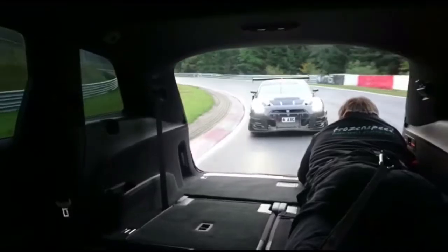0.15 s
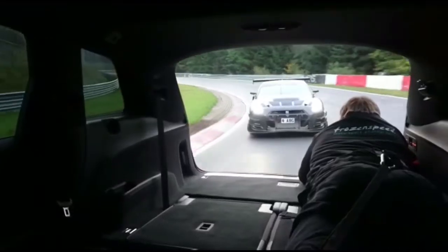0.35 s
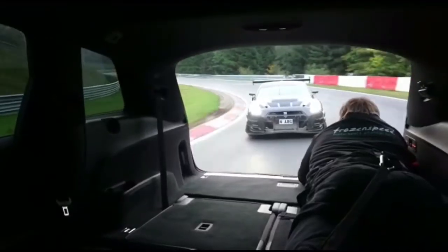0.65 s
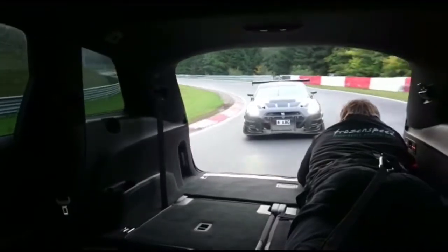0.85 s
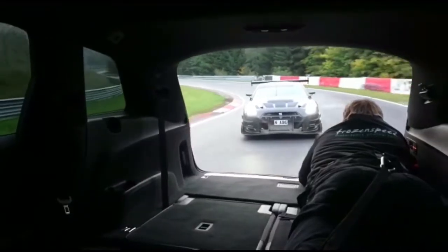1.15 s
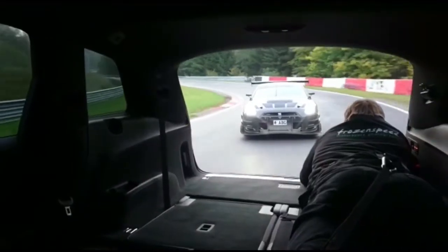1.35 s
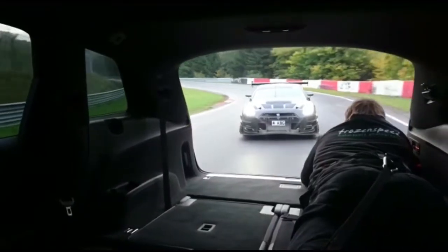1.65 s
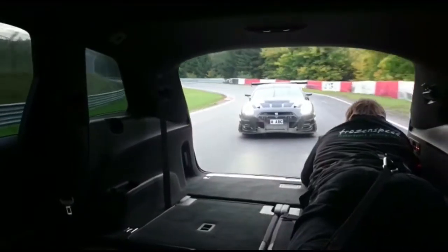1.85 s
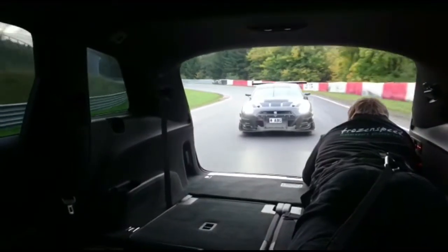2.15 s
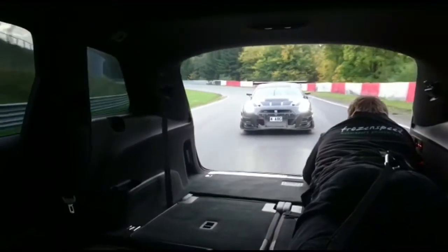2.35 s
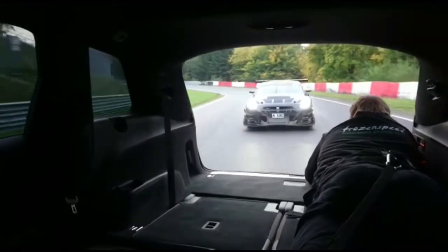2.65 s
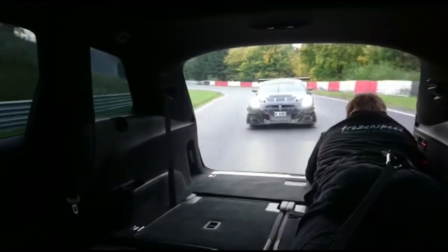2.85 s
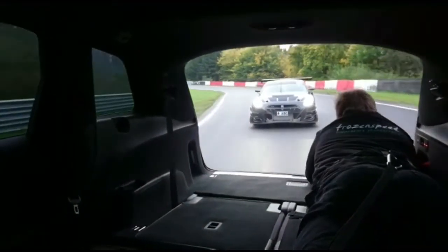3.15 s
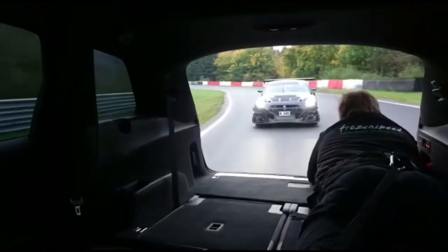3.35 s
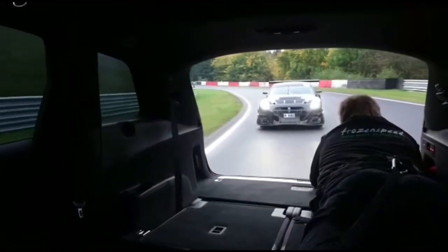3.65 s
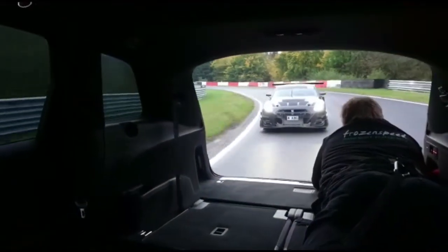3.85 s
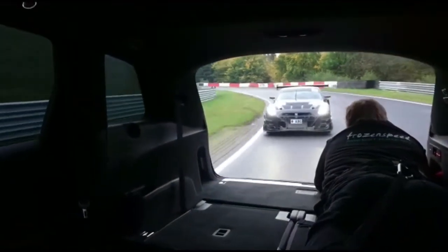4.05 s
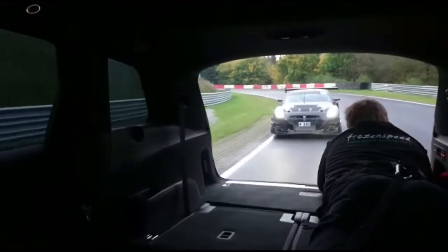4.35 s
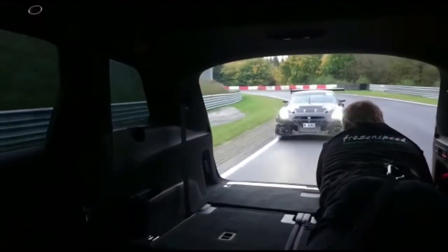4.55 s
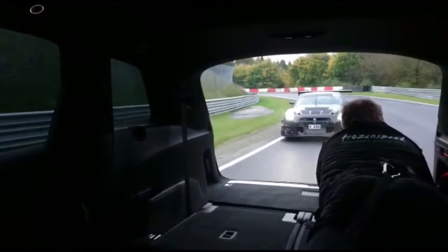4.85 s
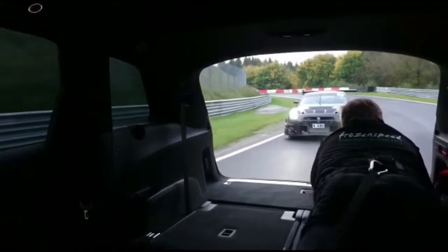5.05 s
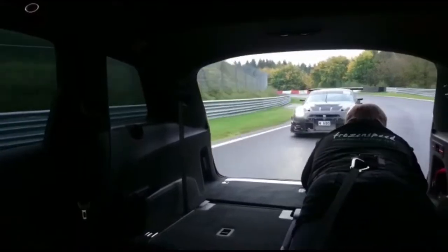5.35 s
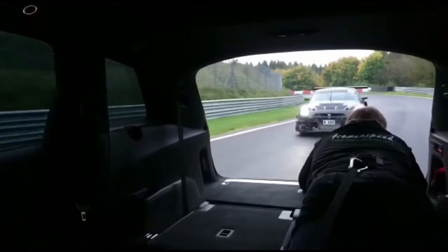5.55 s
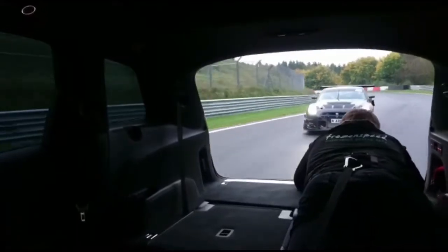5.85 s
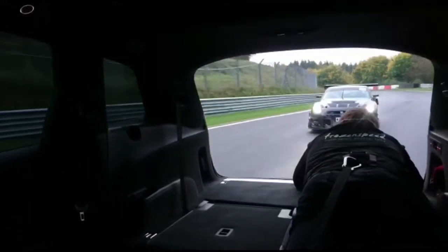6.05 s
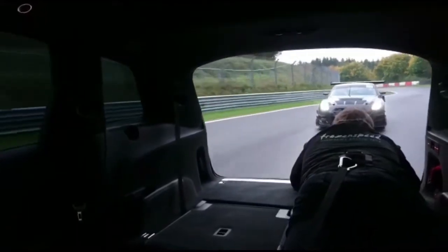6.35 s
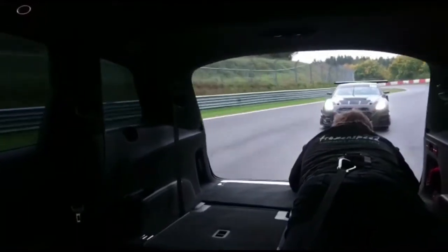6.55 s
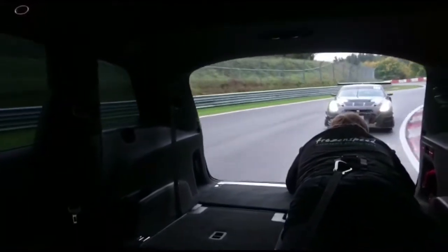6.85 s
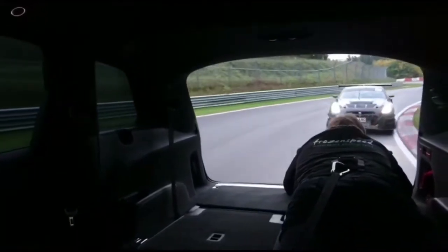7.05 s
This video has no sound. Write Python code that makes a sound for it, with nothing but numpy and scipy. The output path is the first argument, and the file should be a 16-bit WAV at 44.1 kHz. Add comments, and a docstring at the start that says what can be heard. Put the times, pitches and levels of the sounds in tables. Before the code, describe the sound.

Stereo microphone inside a boomy car cabin, open at the back onto a racetrack. Two closely tuned engines hum and throb amid steady road roar, with tyres softly singing in the bend. Pitch rises to a bright hiss, breaking into quick turbo flutter and low burbling as power lifts. The drone thins, wheels thud over a seam, and power resumes.

```python
"""Inside a car with its tailgate open, leading a turbocharged six-cylinder race car round a track.
Throughout, summed engine orders drone and beat as two engines at nearly the same speed do, while
coloured noise makes tyre roar, wind rumble and boost hiss. The revs climb; the throttle shuts at 4.1 s
and the hiss breaks into a flutter of noise bursts over a burble of resonant noise. At 5.9 s a bump thuds,
as short low tones and noise, just before the throttle opens again."""
import sys
import numpy as np
from scipy import signal
from scipy.fft import rfft, irfft
from scipy.io import wavfile

SR = 44100
rng = np.random.default_rng(int(sys.argv[2]) if len(sys.argv) > 2 else 0)


def output_pcm(signal):
    """Save a mono or channel-first signal as 16-bit PCM at the path in sys.argv[1].

    Samples are clipped to [-1, 1] before scaling.
    """
    pcm = np.clip(np.atleast_2d(signal).T, -1, 1) * 32767
    wavfile.write(sys.argv[1], SR, np.round(pcm).astype(np.int16))


N = 317520
T = np.arange(N) / SR  # s
FREQS = np.maximum(np.arange(N // 2 + 1) * SR / N, 1)  # Hz


def undb(db):
    """Decibel definition: the amplitude gain of a level."""
    return 10 ** (np.asarray(db) / 20)


def unit(x):
    """Normalisation to a root-mean-square of 1."""
    return x / np.sqrt(np.mean(x ** 2))


def curves(table):
    """Linear interpolation in time: each column of a table as a value per sample."""
    s, *columns = np.transpose(table)
    return [np.interp(T, s, column) for column in columns]


def across(points):
    """Interpolation over the spectrum, on a logarithmic frequency axis."""
    hz, value = np.transpose(points)
    return np.interp(np.log(FREQS), np.log(hz), value)


def resonances(modes):
    """Modal superposition: steep-sided resonances (f/Hz, width/Hz, level/dB) add in power."""
    power = 0
    for hz, width, db in modes:
        detuning = (FREQS ** 2 - hz ** 2) / (FREQS * width)
        power = power + (undb(db) / (1 + detuning ** 2)) ** 2
    return np.sqrt(power)


def walk(rate):
    """Low-passed Gaussian noise: a smooth random course, rms 1, changing about rate times a second."""
    return unit(irfft(rfft(rng.standard_normal(N)) * np.exp(-(FREQS / rate) ** 2), N))


def flicker():
    """Random amplitude modulation: the slight unsteadiness of a stream of air, in dB."""
    return .5 * walk(25)


def swells(table):
    """Gaussian envelopes: a row of bursts (t/s of the peak, level/dB, half length/s)."""
    return sum(undb(db) * np.exp(-((T - s) / length) ** 2) for s, db, length in table)


# Likeness of the two ears: f/Hz, likeness/(0-1)
EAR_LIKENESS = [(40, .55), (110, .68), (300, .78), (600, .62), (1000, .65), (1500, .55), (2200, .25),
                (4000, 0)]
# Interaural level difference: f/Hz, left minus right level/dB
EAR_BALANCE = [(60, -0.5), (120, -1.5), (350, -8), (700, -1.5), (1400, -8.5), (2400, -3.5), (3500, 0.5),
               (5000, -3.5), (8000, -5.5), (15000, -1.5)]
# Interaural phase difference: f/Hz, lead of the left ear/rad
EAR_LEAD = [(100, 0), (520, .4), (950, -.7), (1500, .7), (2100, 1.8)]


def turbulence(gain):
    """Interaural coherence: coloured noise, alike in the bass, diffuse above, mostly stronger on the right."""
    mid, side = rfft(rng.standard_normal((2, N)))  # what both ears share, and what they do not
    like = np.clip(across(EAR_LIKENESS), -1, 1)
    sign = np.array([[1], [-1]])  # left, right
    level = undb(sign * across(EAR_BALANCE) / 2)
    shift = np.exp(.5j * sign * across(EAR_LEAD))
    ears = np.sqrt(1 + like) * mid + sign * np.sqrt(1 - like) * side
    out = irfft(ears * level * shift * gain, N)
    return out / np.std(out.mean(axis=0))


def wavering(modes, waver_db, rate):
    """Resonance driven by turbulence: each mode swells and fades on its own; rms 1."""
    total = 0
    for hz, width, db in modes:
        ring = np.sqrt(width) * turbulence(resonances([(hz, width, 0)]))
        total = total + undb(db + waver_db * walk(rate)) * ring
    return unit(total)


# Engine speed: t/s, firing rate f/Hz
FIRING_RATE = [(0,153.3),(.9,155.3),(2.1,155.7),(2.4,157),(2.75,161),(3.1,166.6),(3.8,183),(4.4,183.6),(5,179.4),(5.85,172),(6.4,171.3),(7.2,175.5)]


def engine_cycle():
    """Phase as the integral of frequency: the two-turn cycle in rad, and its rate in Hz."""
    cycle_hz = curves(FIRING_RATE)[0] / 6  # six firings a cycle
    return 2 * np.pi * np.cumsum(cycle_hz) / SR, cycle_hz


# The throttle snaps shut, and is later eased open again: instants and time constants, s
SHUT_S, OPEN_S = 4.075, 5.982
SHUTTING_S, OPENING_S = .011, .026


def throttle():
    """Smooth switching by hyperbolic tangents: 1 under power, 0 while coasting."""
    shut = np.tanh((T - SHUT_S) / SHUTTING_S)
    opened = np.tanh((T - OPEN_S) / OPENING_S)
    return 1 - (shut - opened) / 2


# Instants at which the second engine has slipped one more firing and opposes the first:
# t/s, its share of the firing note/1, its share of the upper lines/1
BEATS = [(-.2, .1, 0.2), (.48, 0.11, 0.11), (1.16, .3, 0.13), (1.63, 0.37, 0.21), (2.2, 0.43, 0.21),
         (2.7, 0.042, 0.075), (4.1, .03, 0.054), (5.93, 0.22, 0.42), (6.22, 0.39, 0.56), (6.54, 0.53, 0.48),
         (6.86, 0.082, .6), (7.12, 0.072, .15)]


def beating():
    """Beats of two nearly equal tones: the phase slip in rad and the second engine's two shares."""
    slip = 2 * np.pi * np.interp(T, np.transpose(BEATS)[0], np.arange(len(BEATS)))
    low_share, high_share = np.clip(curves(BEATS), 0, 1)
    return slip, low_share, high_share


def engine_order(phase, pan_db, lead, rough, rate, throb=1):
    """Harmonic with random modulation: one exhaust line as both ears get it (pan and lead: left over right)."""
    waver = 1 + rough * (walk(rate) + 1j * walk(rate))  # in strength and timing
    z = throb * np.exp(1j * phase) * waver
    left = undb(pan_db)
    return np.sqrt(2) * np.real([left * z * np.exp(1j * lead), z]) * 2 / (1 + left)


# Firing note under power: t/s, level/dB
DRONE_POWER = [(0, -12.5), (2.15, -14.5), (2.42, -11.5), (3.6, -11), (4.03, -15), (6.05, -17.5),
               (6.5, -17.5), (6.72, -12), (7.2, -16.3)]
# Firing note while coasting: t/s, level/dB
DRONE_COAST = [(4.1, -17), (4.2, -22.5), (4.33, -20), (4.6, -24), (5.1, -30.5), (5.45, -26.5), (5.55, -22),
               (5.9, -29)]


def firing_note(firing, power, beats):
    """Phase reversal: off throttle the cylinders suck instead of push, so each change passes through nothing."""
    slip, low_share, _ = beats
    push = power * undb(curves(DRONE_POWER)[0]) - (1 - power) * undb(curves(DRONE_COAST)[0])
    throb = 1 - low_share * np.exp(1j * slip)
    rough = 0.042 + 0.13 * (1 - power)
    return push * engine_order(firing, pan_db=-4.5, lead=0.15, rough=rough, rate=19, throb=throb)


# The two banks' line at 1.5 times the firing note: t/s, level/dB
BANK_LEVEL = [(0, -27), (.9, -29), (2.2, -29), (2.42, -33.5), (3.75, -25.5), (4.2, -32), (5.1, -32),
              (5.22, -48), (5.88, -53), (6.02, -29.5), (7.2, -25.5)]


def bank_line(firing, power, beats):
    """Half-order harmonics: each bank fires at half the rate, and its third harmonic sounds here."""
    slip, _, high_share = beats
    throb = 1 - 1j * high_share * np.exp(1.5j * slip)
    rough = .13 + 0.35 * (1 - power)
    line = engine_order(1.5 * firing, pan_db=-6.5, lead=0.12, rough=rough, rate=8, throb=throb)
    return undb(curves(BANK_LEVEL)[0]) * line


# The firing note's octave under power: t/s, level/dB
OCTAVE_LEVEL = [(0, -26.5), (2.1, -26), (2.35, -29.5), (2.9, -28), (3.6, -37.5), (4.0, -30.5), (4.7, -40),
                (5.95, -44), (6.25, -38), (7.2, -36)]
# Lag of the octave's throb behind that of the firing note: t/s, lag/turns
OCTAVE_THROB_LAG = [(2.7, 0), (5.9, .58)]
OVERTONE_COAST_DB = -8.5  # the octave's change of level while coasting


def octave(firing, power, beats):
    """Second harmonic: it beats twice as fast as the firing note."""
    slip, _, high_share = beats
    lag = np.pi * curves(OCTAVE_THROB_LAG)[0]  # doubled with the slip
    throb = 1 + high_share * np.exp(2j * (slip - lag))
    level = undb(curves(OCTAVE_LEVEL)[0] + OVERTONE_COAST_DB * (1 - power))
    return level * engine_order(2 * firing, pan_db=-9, lead=0.086, rough=0.12, rate=8.6, throb=throb)


# Common level of the weak orders: t/s, level/dB
WEAK_LEVEL = [(0, -26.5), (1, -29), (2.2, -29), (2.9, -36.5), (3.4, -34.5), (3.92, -25), (4.25, -39.5),
              (5.8, -39.5), (7.2, -33)]
# Weak orders: multiple of the two-turn engine cycle/1, relative level/dB
WEAK_ORDERS = [(3, -11.5), (5, -14.5), (7, -2), (8, -10.5), (10, -5.5), (11, -13.5), (13, -16), (14, -13),
               (15, -7), (16, -10), (17, -13), (18, -8), (19, -14), (21, -10.5), (24, -16.5)]
# Transmission of the weak orders by the cabin: f/Hz, gain level/dB
CABIN_GAIN = [(70, 1), (270, -2.5), (340, -1.5), (400, -16.5), (460, -2.5), (510, -5.5), (545, -9),
              (610, -22), (700, -8), (780, -14)]


def weak_orders(cycle, cycle_hz):
    """Broken symmetry of banks and cylinders: most orders lie between the firing harmonics, two on 3 and 4."""
    cabin_hz, cabin_db = np.transpose(CABIN_GAIN)
    weak = 0
    for k, db in WEAK_ORDERS:
        gain = undb(db + np.interp(k * cycle_hz, cabin_hz, cabin_db))
        phase = k * cycle + rng.uniform(0, 2 * np.pi)
        weak = weak + gain * engine_order(phase, pan_db=-7.5, lead=0.89, rough=0.25, rate=13)
    return undb(curves(WEAK_LEVEL)[0]) * weak


def exhaust(cycle, cycle_hz):
    """Fourier synthesis: six firings a cycle give the strong lines, to which the weak orders add."""
    firing, power, beats = 6 * cycle, throttle(), beating()
    strong = firing_note(firing, power, beats) + bank_line(firing, power, beats) + octave(firing, power, beats)
    return strong + weak_orders(cycle, cycle_hz)


# Road noise before the offsets in road(): t/s, rumble level/dB, roar level/dB, rush level/dB
ROAD_LEVELS = [(0, -34, -32, -47.5), (.8, -31.5, -32.5, -48), (2.3, -32, -33.5, -48.5),
               (2.6, -34.5, -37, -50.5), (3.35, -34.5, -35.5, -55.5), (4.02, -29.5, -28, -42.5),
               (4.25, -29.5, -31.5, -47), (5.9, -29, -34.3, -50.5), (7.2, -31.5, -34, -49.3)]
# Noise spectra of wind rumble, tyre roar and rushing air: f/Hz, level/(dB per Hz)
RUMBLE_COLOUR = [(20, -30.5), (35, -8.5), (52, -1.5), (80, 4), (110, 1.5), (160, -0.5), (220, -12),
                 (320, -13.5), (420, -28.5), (700, -50.5), (3000, -94)]
ROAR_COLOUR = [(100, -33), (450, -4.5), (590, -4), (710, 2), (880, -1), (960, 1), (1090, 1.5), (1310, -4),
               (1490, 3), (1630, -2.5), (1950, -4.5), (2300, -18), (4000, -38), (9000, -82)]
RUSH_COLOUR = [(1200, -8), (2200, 4), (2800, 1.5), (3500, 0), (4400, -8), (6000, -8.5), (7200, -11),
               (9000, -16.5), (12000, -27.5), (16000, -37.5)]
# Ringing of the cabin panels: f/Hz, width/Hz, level/dB
PANEL_MODES = [(697, 30, 0), (850, 25, -2), (935, 35, 1), (1062, 45, 0), (1556, 35, 1), (1690, 35, 0),
               (1868, 35, 1), (2018, 55, 5), (2288, 40, 6), (2690, 35, 1), (3020, 35, 0), (3380, 35, 0)]
# Singing of tyres under side load in the bend: f/Hz, width/Hz, level/dB
SING_MODES = [(942, 58, 4), (1060, 60, -2), (1067, 190, 0.5), (1170, 60, -11.5)]
# Level of that singing: t/s, level/dB
SING_LEVEL = [(0, -38), (.8, -40.5), (2.3, -41.5), (2.9, -48.5), (3.6, -56), (7.2, -47.5)]
# Tyre whine: f/Hz, width/Hz, level/dB
WHINE_MODES = [(1041, 37, -6), (1215, 28, 0), (1497, 56, -1)]
# Level of the whine before the offset in road(): t/s, level/dB
WHINE_LEVEL = [(0, -57), (3.3, -53.5), (4.1, -40), (4.6, -52.5), (5.6, -43.5), (6.3, -42), (7.2, -45.5)]


def road(cycle):
    """Broadband and resonant noise: wind buffets the tailgate, tyres roar, sing and whine, air rushes."""
    rumble_db, roar_db, rush_db = curves(ROAD_LEVELS)
    panels = np.sqrt(1 + resonances(PANEL_MODES) ** 2)
    rumble = undb(rumble_db + 2.9 + flicker()) * turbulence(undb(across(RUMBLE_COLOUR)))
    roar = undb(roar_db - 2.5 + flicker()) * turbulence(undb(across(ROAR_COLOUR)) * panels)
    rush = undb(rush_db + 4.0 + flicker()) * turbulence(undb(across(RUSH_COLOUR)) * panels)
    sing = undb(curves(SING_LEVEL)[0] + 1.6 * walk(16)) * turbulence(resonances(SING_MODES))
    whine = undb(curves(WHINE_LEVEL)[0] + 2.0) * wavering(WHINE_MODES, waver_db=5, rate=5.5)
    throb = 1 + 0.16 * np.cos(6 * cycle)  # roar and rush pulse a little with the firings
    return rumble + sing + whine + (roar + rush) * throb


# Ringing of the intake pipe: f/Hz, width/Hz, level/dB
INTAKE_MODES = [(2972, 45, 2), (3122, 90, 2), (3540, 45, 1), (3640, 40, 6), (3930, 40, 6), (4580, 60, 0),
                (5050, 90, -1), (6050, 80, -1), (6417, 70, 0), (7386, 35, 3)]


def intake_pipe():
    """Pipe resonance: direct sound and the pipe's modes add in power."""
    return np.sqrt(1 + resonances(INTAKE_MODES) ** 2)


# Steady boost hiss: t/s, level/dB
BOOST_LEVEL = [(0, -57), (3.1, -56), (3.45, -52), (3.65, -40.5), (4.0, -31.5), (4.17, -40), (4.85, -48),
               (5.9, -59), (7.2, -60.5)]
# Noise spectrum of the hiss, and of weak surges: f/Hz, level/(dB per Hz)
HISS_COLOUR = [(1500, -16.5), (2600, -18), (3150, 4.5), (3700, -3.5), (4500, 1), (5300, -1.5), (6400, 0),
               (7400, -1), (9000, -2.5), (12000, -5), (16000, -14.5)]


def boost_hiss(pipe):
    """Jet noise: boost hisses through the intake."""
    return undb(curves(BOOST_LEVEL)[0] + flicker()) * turbulence(undb(across(HISS_COLOUR)) * pipe)


# Spooling compressor: t/s, level/dB
SPOOL_LEVEL = [(0, -55.5), (2.6, -60.5), (3.1, -46.5), (3.68, -43), (3.92, -35), (4.2, -48.5), (4.8, -51.5),
               (5.6, -66)]
# Noise spectrum of its rasp: f/Hz, level/(dB per Hz)
RASP_COLOUR = [(1200, -43), (2500, -12), (2950, -2), (3350, -3.5), (3650, -2), (4000, -1), (4500, -10.5),
               (6400, -9), (9000, -20.5), (16000, -42.5)]
# Its whistle in narrow rings between 3 and 4 kHz: f/Hz, width/Hz, level/dB
WHISTLE_MODES = [(3030, 70, -0.5), (3640, 35, -1), (3925, 25, 1)]
WHISTLE_DB = -4  # whistle relative to rasp


def spooling(pipe):
    """Resonant excitation: the compressor rasps as noise and whistles in narrow rings between 3 and 4 kHz."""
    rasp = turbulence(undb(across(RASP_COLOUR)) * pipe)
    whistle = undb(WHISTLE_DB) * wavering(WHISTLE_MODES, waver_db=2.5, rate=7)
    return undb(curves(SPOOL_LEVEL)[0] + flicker()) * (rasp + whistle)


# A surge bursts out, holds (from its start; longer the stronger it is) and dies away
SURGE_ATTACK_S, SURGE_HOLD_S, SURGE_RELEASE_S = 0.018, 0.044, 0.018
SURGE_FULL_DB, SURGE_HOLD_LAW = -24.5, 0.3  # the level that gets SURGE_HOLD_S; hold goes as gain to this power


def stall(start, db):
    """Attack-hold-release envelope: the gain of one compressor surge."""
    age = T - start
    hold = SURGE_HOLD_S * undb(db - SURGE_FULL_DB) ** SURGE_HOLD_LAW
    attack = np.clip(age / SURGE_ATTACK_S, 0, 1)
    release = np.exp(-np.clip(age - hold, 0, 1) / SURGE_RELEASE_S)
    return undb(db) * attack * release


# Compressor surges: start t/s, level/dB
SURGE_STARTS = [(3.968, -26), (4.063, -22), (4.186, -27.5), (4.286, -25), (4.383, -29), (4.483, -35.5),
                (4.577, -40), (4.672, -40), (4.762, -32.5), (4.853, -39.5), (4.942, -38), (5.032, -41.5),
                (5.113, -41.5), (5.22, -51), (5.298, -45), (5.378, -46.5), (5.468, -48)]
# Noise spectrum of hard surges: f/Hz, level/(dB per Hz)
SPIT_COLOUR = [(1500, -8), (2700, -13.5), (3600, -6), (4600, -9.5), (6400, -5), (7400, -5.5), (9000, -5.5),
               (12000, -4), (16000, -10)]


def flutter(pipe):
    """Compressor surge: against a shut throttle the flow stalls about eleven times a second."""
    grit_db = 1.4 * walk(300) + .6 * walk(50)
    surge = sum(stall(start, db) for start, db in SURGE_STARTS)
    bright = np.clip(surge / undb(-30.5), 0, 1)  # hard surges spit brightly, weak ones only puff
    spit = turbulence(undb(across(SPIT_COLOUR)) * pipe)
    puff = turbulence(undb(across(HISS_COLOUR)) * pipe)
    return surge * undb(grit_db) * (np.sqrt(bright) * spit + np.sqrt(1 - bright) * puff)


def turbo():
    """Aerodynamic noise filtered by a pipe: hiss, rasp and flutter share one intake; a whistle adds to them."""
    pipe = intake_pipe()
    return boost_hiss(pipe) + spooling(pipe) + flutter(pipe)


# Burble of the exhaust: t/s, level/dB
BURBLE_LEVEL = [(3.4, -62), (3.85, -36), (4.04, -27), (4.19, -32), (4.3, -25), (4.6, -35.5), (5.1, -43.5),
                (5.4, -59.5), (7.2, -43)]
# Exhaust pipe resonances: f/Hz, width/Hz, level/dB
EXHAUST_MODES = [(199, 65, 0), (267, 32, -3.5), (362, 34, 1.5), (533, 75, -13.5)]


def overrun():
    """Noise-driven pipe resonance: uneven burning makes the exhaust burble as the throttle shuts."""
    return undb(curves(BURBLE_LEVEL)[0] + 1.6 * walk(30)) * turbulence(resonances(EXHAUST_MODES))


# Boom of the car body: peak t/s, f/Hz, level/dB, half length/s
BODY_BOOMS = [(5.856, 79.7, -15.5, 0.0083), (5.886, 62, -17, 0.017), (5.921, 71.5, -17.5, 0.013)]
# Rumble of the trim: peak t/s, level/dB, half length/s
TRIM_BURSTS = [(5.87, -25, 0.01), (5.914, -15, 0.019)]
# Noise spectrum of the trim: f/Hz, level/(dB per Hz)
TRIM_COLOUR = [(25, -29.5), (45, -4.5), (62, -6.5), (110, 6.5), (170, 5), (260, -7), (420, -14), (700, -30),
               (3000, -92)]


def bump():
    """Impulse response: wheels cross a seam, the trim rumbles and the body booms for a cycle or two."""
    boom = 0
    for s, hz, db, length in BODY_BOOMS:
        boom = boom + swells([(s, db, length)]) * np.cos(2 * np.pi * hz * (T - s))
    return boom + swells(TRIM_BURSTS) * turbulence(undb(across(TRIM_COLOUR)))


def cabin(air):
    """Early reflection: glass and trim throw back the treble within hundredths of a second, per ear."""
    tail = rng.standard_normal((2, N)) * np.exp(-T / .012)  # decay constant in s
    tail /= np.sqrt(np.sum(tail ** 2, axis=1, keepdims=True))
    share = undb(across([(600, -30), (2000, -8), (4000, -6)]))  # reflected share: f/Hz, level/dB
    return irfft(rfft(air) * (1 + share * rfft(tail)) / np.sqrt(1 + share ** 2), N)


def scene():
    """Superposition: engine, road, turbo and bump add as heard in the load bay."""
    cycle, cycle_hz = engine_cycle()
    air = road(cycle) + turbo()
    return exhaust(cycle, cycle_hz) + cabin(air) + overrun() + bump()


# Response of the microphone's port, which swallows the top: f/Hz, gain level/dB
PORT_GAIN = [(20, 1), (7300, -0.5), (7650, -7.5), (8120, -17.5), (8700, -9), (16000, -17.5)]
TOP_HZ = 15750  # the recorder's upper band limit


def record(dry):
    """Linear filtering: the microphone's port dulls the treble, and the recorder cuts above its limit."""
    from_ends = np.minimum(T, T[-1] - T)
    fade = np.sin(np.pi / 2 * np.clip(from_ends / .005, 0, 1)) ** 2  # 5 ms at each end
    coloured = irfft(rfft(dry * fade) * undb(across(PORT_GAIN)), N)
    low_pass = signal.ellip(8, .2, 70, TOP_HZ, fs=SR, output="sos")
    return signal.sosfilt(low_pass, coloured)


dry = scene()
out = record(dry)
output_pcm(out)
```